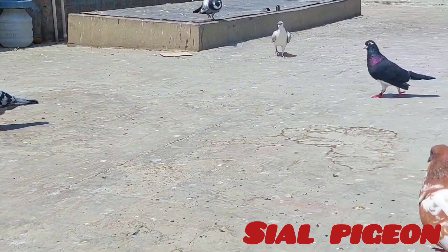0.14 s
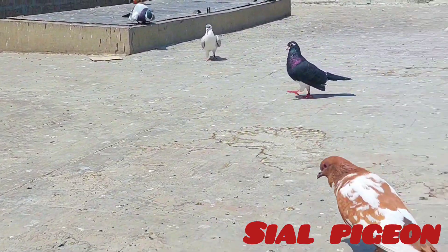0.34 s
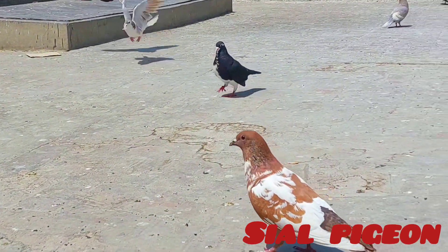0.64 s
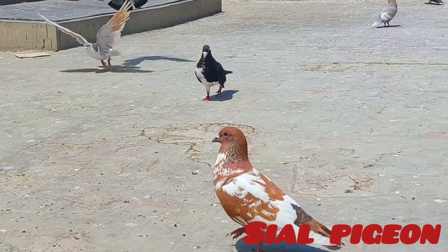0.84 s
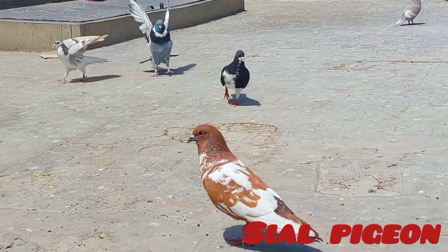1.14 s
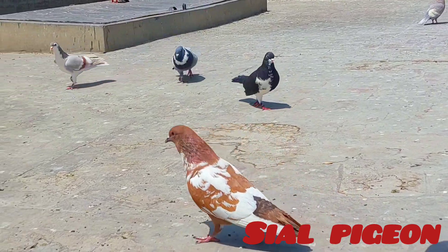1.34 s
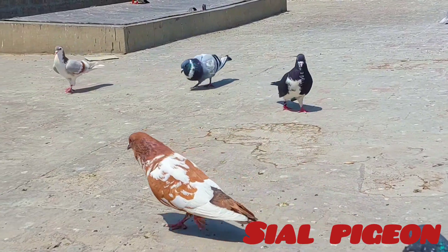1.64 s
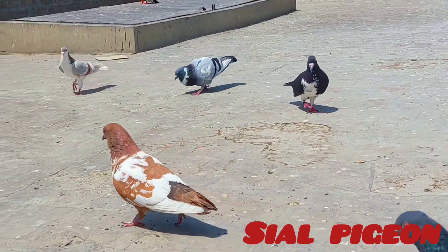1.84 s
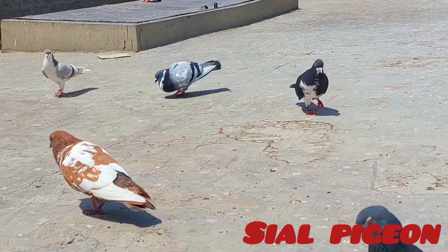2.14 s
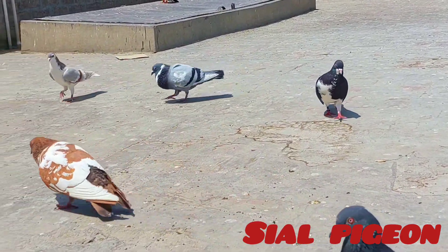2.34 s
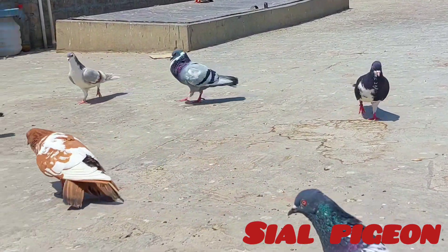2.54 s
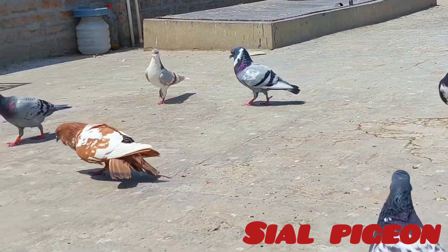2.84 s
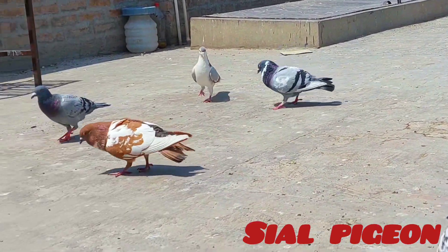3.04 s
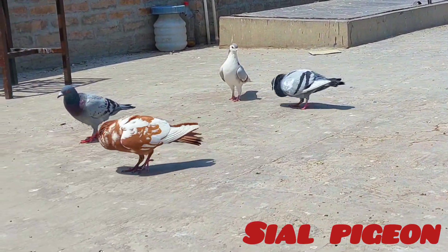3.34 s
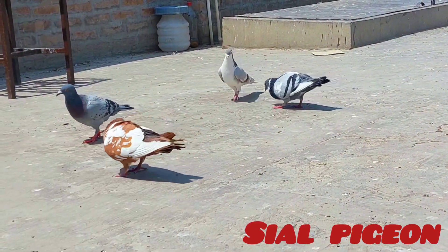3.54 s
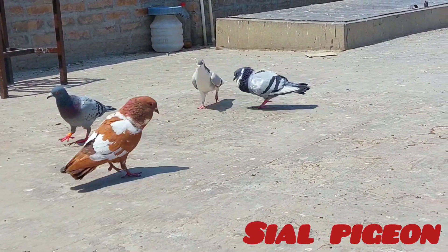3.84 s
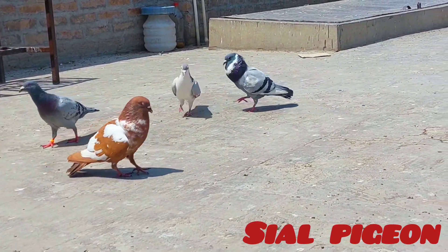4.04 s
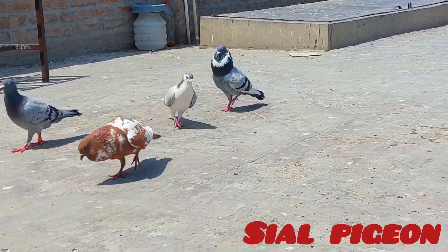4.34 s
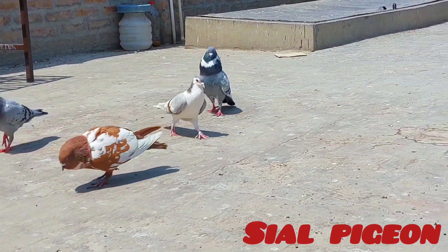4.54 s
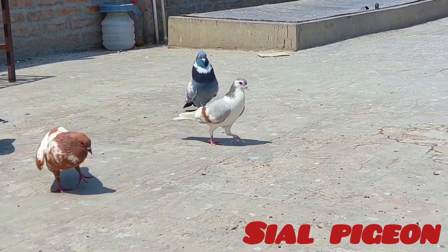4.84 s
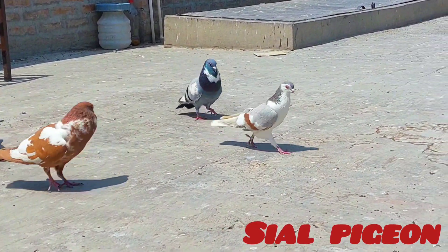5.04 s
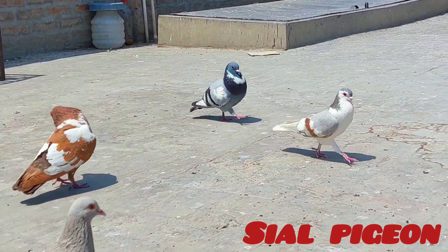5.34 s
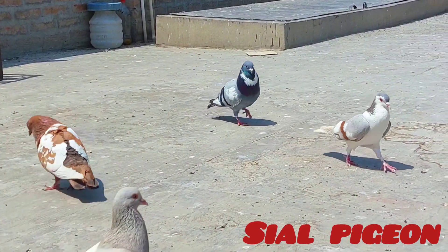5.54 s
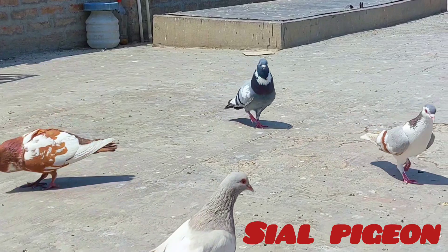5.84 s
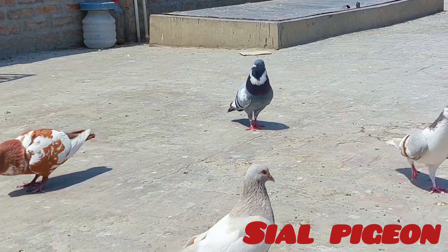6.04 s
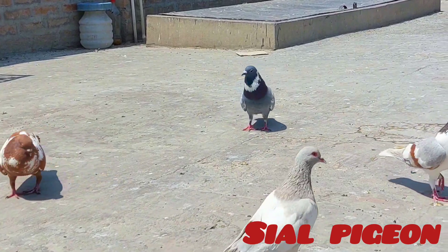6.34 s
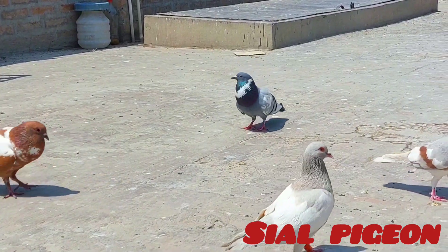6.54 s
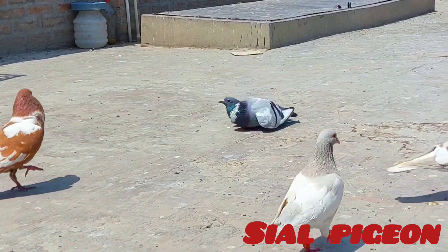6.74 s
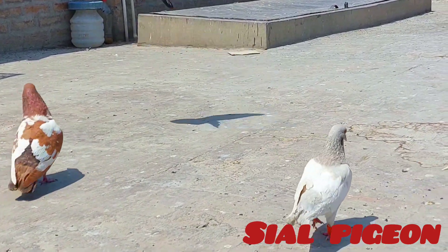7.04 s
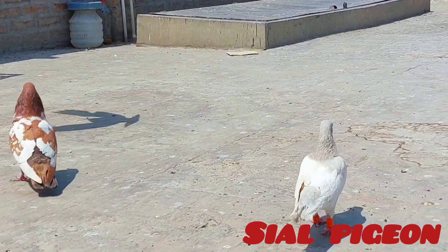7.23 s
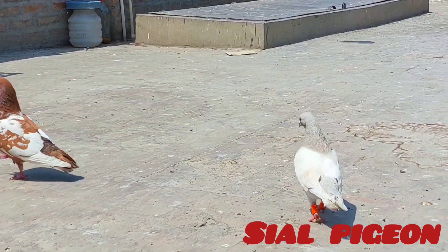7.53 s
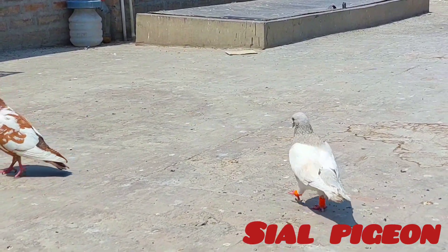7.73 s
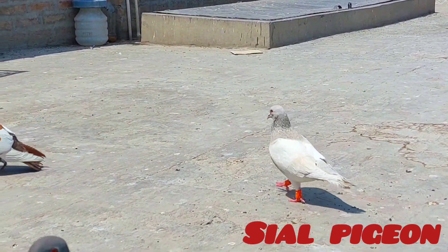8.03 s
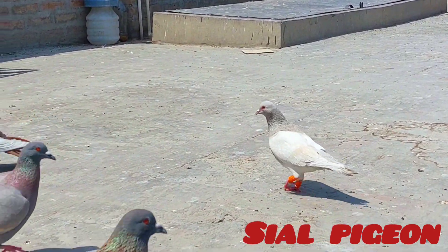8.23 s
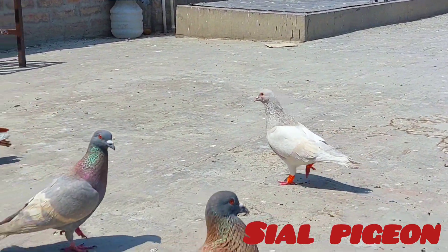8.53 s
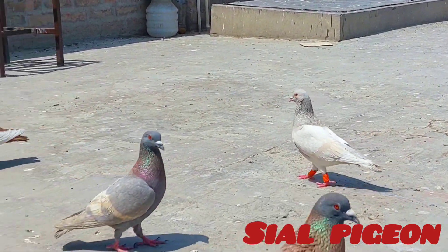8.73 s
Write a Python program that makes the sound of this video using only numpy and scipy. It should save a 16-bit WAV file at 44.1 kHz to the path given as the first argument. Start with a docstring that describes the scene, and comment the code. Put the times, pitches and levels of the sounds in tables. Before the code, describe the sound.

On an open rooftop, pigeons coo without pause, the nearest ones warbling and gulping in front of a softer chorus. Wings flutter briefly near the start and again a little later, among faint feather rustles and claws ticking on concrete. Towards the end one bird takes off with loud, dry wing claps. The sound is close and in stereo, with a slight echo and a faint distant town hum.

```python
"""Pigeons courting on a roof

A stereo pair on a walled concrete roof. Close by, a few birds coo from swollen crops, now clear, now
throbbing; further off the flock murmurs. Wings clap and swish as birds hop and one flies off; claws
tick, leg rings clink, feathers flick and rustle. Low walls give a short echo; the town rumbles far away."""
import sys
import numpy as np
from scipy import signal
from scipy.fft import rfft, irfft
from scipy.io import wavfile
from scipy.ndimage import uniform_filter1d

SR = 44100
rng = np.random.default_rng(int(sys.argv[2]) if len(sys.argv) > 2 else 0)


def persist_wave(psi):
    """Save psi, clipped to +-1, as 16-bit WAV."""
    counts = np.round(np.clip(psi, -1, 1) * 32767).astype(np.int16)
    wavfile.write(sys.argv[1], SR, np.atleast_2d(counts).T)


N = 391608
TIME = np.arange(N) / SR

# Levels are relative within each table. A positive pan is to the left; half of it separates the channels.
# the distant town's spectrum: (frequency [Hz], level [dB])
TOWN_SPECTRUM = [(25, -17.5), (50, -14.5), (70, -11), (100, -2), (148, 5.5), (180, -4), (400, -4),
                 (800, -26), (1400, -37), (2300, -35), (3200, -44), (8000, -44.5), (15000, -40)]
# its deep rumble coming and going: (time [s], level [dB])
TOWN_RUMBLE = [(0, -56.5), (1.2, -50), (2.3, -47), (2.6, -59), (3.2, -48.5), (4.3, -57.5), (5.3, -58),
               (5.8, -50.5), (6.4, -56), (7.7, -49), (8.2, -60), (8.88, -50)]
# bouts of ruffled feathers and shuffling feet: (start [s], length [s], level [dB])
RUSTLE_BOUTS = [(0.0, 0.1, -70), (0.443, 0.43, -60), (0.8, 0.25, -59.5), (1.22, 0.17, -65),
                (1.916, 0.72, -70), (2.832, 0.79, -59), (3.54, 0.18, -94), (5.178, 0.91, -64),
                (6.055, 0.8, -61.5), (6.836, 0.83, -52), (7.535, 0.66, -57.5), (8.208, 0.68, -65.5)]
# spectrum of that rustle: (frequency [Hz], level [dB])
RUSTLE_SPECTRUM = [(300, -14), (800, 8), (1400, -1), (2300, 0.5), (3300, -11), (4400, -6.5), (6300, -11),
                   (8500, -19), (12000, -9.5), (15500, -20.5)]
# a foot or feather tip brushing the floor: (time [s], level [dB], pan [dB])
FLOOR_BRUSHES = [(1.29, -66, 0), (2.025, -63, 8), (2.539, -53, 2), (2.584, -56, 7), (2.724, -53.5, 0),
                 (3.055, -56, -2), (3.31, -62, -1), (3.595, -57, 6), (3.655, -54.5, -7), (3.736, -65, 3),
                 (4.146, -60.5, 3.5), (4.22, -54.5, -5), (4.36, -53, -2), (4.48, -56, -8),
                 (4.529, -58.5, 1), (5.52, -55, 2), (5.67, -51.5, -10), (5.844, -55, -7), (6.031, -62, 7),
                 (8.025, -53, -14), (8.224, -52, 1), (8.59, -65, 4)]
# claws and beaks on concrete: (time [s], level [dB], pan [dB])
CLAW_TICKS = [(0.3062, -41, 5), (0.9165, -38, -12), (2.15, -39, 6), (2.326, -32.5, 4), (2.857, -30.5, -8),
              (3.361, -36, -11), (4.0435, -36, 8), (5.023, -40, -15), (6.351, -32.5, 13), (7.1077, -26, -7),
              (7.226, -37, -9), (7.353, -33, -1.5), (8.22, -33.5, 2), (8.588, -35, 5)]
# a leg ring jolted by a step: (time [s], level [dB])
RING_CLINKS = [(4.025, -51), (4.835, -60), (4.884, -61.5)]
# the ring's modes: (frequency [Hz], level [dB])
RING_MODES = [(4610, -7), (4890, -2), (5370, -14)]
# wing beats, and a few thin, bright feather flicks with hardly any smack:
# (time [s], level [dB], midrange smack [dB], swish against clap [dB], pan [dB])
BEATS_AND_FLICKS = [(0.5294, -32.5, -2.5, -5, -1), (0.545, -45, 2, 3.5, 3), (0.6085, -32, 3.5, -9, -4),
                    (0.73, -39.5, -3, -5, -3), (0.958, -32.5, 1.5, -1, -3), (0.979, -28, -15, -9, 3),
                    (2.8748, -32.5, -2.5, -4.5, -5), (2.99, -35, 0.5, -4, -1),
                    (3.1053, -34, -0.5, -15.5, -5), (3.229, -32, -0.5, -13, 3), (3.4021, -32.5, -20, -4, 9),
                    (3.496, -37, -1, -10, 0), (4.0154, -36.5, -22, -9.5, 22),
                    (4.6085, -34.5, -1, -4.5, 6.5), (4.8817, -41.5, -19, -8, 17.5),
                    (5.006, -41.5, -24, -5, 7), (6.3036, -36.5, 7, -8, 3),
                    (6.4303, -32.5, 1.5, -19.5, -7.5), (6.5564, -27.5, 0, -10, 1),
                    (6.691, -29, 1, -11.5, -2), (6.8306, -30.5, 0, -8, -3), (6.9593, -45, 3.5, 8.5, -1.5),
                    (7.0454, -24.5, -3, -7.5, 1), (7.16, -17.5, -2, -16.5, 3.5), (7.228, -31, 2, -15, -6),
                    (7.283, -22.5, -3.5, -13, -15), (7.4062, -14, -2.5, -18, -3),
                    (7.5489, -26.5, -2, -13, -2), (7.702, -32.5, 1, -23, 4), (8.4033, -31, -2, -11.5, 0),
                    (8.784, -43, -18, -15, 28)]
# spectrum of a wing's smack: (frequency [Hz], level [dB])
SMACK_SPECTRUM = [(50, -34), (150, 7), (500, -10), (700, 8), (1000, 3), (1600, 1.5), (2250, 3.5), (2700, 3),
                  (3400, -14.5), (6000, -41)]
# wing tips meeting hard: (time [s], level [dB], pan [dB])
WING_CRACKS = [(0.531, -33, -3), (0.61, -30, -4), (7.161, -18, 2), (7.172, -24, 2), (7.2995, -20, -2),
               (7.4068, -14.5, 2), (7.411, -7, -3)]
# the quills' modes: (frequency [Hz], level [dB], t60 before feather damping [s])
QUILL_MODES = [(1600, -22, 0.12), (1980, -1, 0.023), (2280, 1.5, 0.047), (2525, -3.5, 0.026),
               (2972, -17, 0.036), (4043, -19, 0.11)]
# the flock's murmur, further back: (time [s], level [dB])
FLOCK_MURMUR = [(0.0, -25.5), (0.89, -26.5), (1.19, -24.5), (1.43, -27.5), (1.73, -21.5), (2.03, -29.5),
                (2.42, -21.5), (3.04, -20.5), (4.7, -22), (4.99, -23.5), (5.39, -26.5), (5.44, -23.5),
                (6.18, -20), (6.48, -24.5), (6.6, -21.5), (7.54, -28.5), (7.86, -22.5), (8.88, -21)]
# the flock's high, strained voices: (time [s], level [dB])
FLOCK_STRAIN = [(0.0, -42), (0.52, -41.5), (0.62, -47), (0.99, -39.5), (2.0, -39), (2.82, -38),
                (2.89, -41.5), (3.56, -34.5), (4.2, -45.5), (4.57, -37), (4.62, -42), (5.89, -43.5),
                (6.03, -29.5), (6.13, -39), (6.95, -37.5), (7.32, -42), (7.81, -38), (8.88, -37.5)]
# close throat pulses, loud gulps to thin squeaks: (time [s], pitch [Hz], level [dB], glide [octaves])
NEAR_GULPS = [(0.235, 525, -33.5, 0.19), (0.257, 297, -21.5, 0.037), (0.449, 558, -41, -0.19),
              (0.489, 392, -23.5, -0.22), (0.819, 284.8, -18.5, -0.12), (0.86, 632, -36, -0.19),
              (0.93, 739, -42, -0.059), (0.981, 287, -16.5, -.15), (1.037, 308.6, -15, 0.0076),
              (1.087, 303, -20, -0.36), (1.138, 286.4, -21.5, 0.11), (1.163, 315.5, -19, -0.51),
              (1.196, 270, -16.5, -0.1), (1.925, 259, -29, -.15), (1.987, 289, -20.5, -0.2),
              (2.092, 309, -21.5, -0.22), (2.17, 704, -39, 0.033), (2.182, 299, -23, -0.27),
              (2.284, 630, -36, .35), (2.44, 391, -18.5, -0.26), (2.467, 335, -21, -0.11),
              (2.741, 301, -19.5, -.15), (3.005, 312.4, -17.5, -0.058), (3.062, 685, -39, .4),
              (3.085, 817, -47.5, -0.022), (3.175, 952, -44, 0.099), (3.305, 697, -41, 0.28),
              (3.516, 294.4, -20.5, -0.44), (3.638, 476, -25, -0.38), (3.652, 323, -18.5, -0.18),
              (3.89, 270, -21.5, 0.28), (3.994, 324, -20, -0.089), (4.263, 530, -35, -0.077),
              (4.339, 316.5, -21, -0.23), (4.558, 360, -20, -0.12), (5.011, 377.5, -21.5, 0.36),
              (5.06, 455, -28.5, -.15), (5.32, 609, -39, -.1), (5.652, 340, -21, -0.11),
              (5.822, 306, -22, -.15), (5.979, 307.5, -15.5, -0.21), (6.015, 547, -24, -0.21),
              (6.032, 278, -18, -0.19), (6.192, 338.3, -19, -0.33), (7.036, 309, -22.5, -.15),
              (7.165, 255, -22.5, -.15), (7.182, 686, -36, -.15), (7.803, 381.4, -17, -0.16),
              (7.885, 292, -23, .15), (8.141, 305, -22.5, -0.19), (8.236, 552, -34, 0.19),
              (8.283, 699, -39, -0.086), (8.306, 314.3, -17.5, -0.22), (8.322, 902, -40.5, 0.27),
              (8.326, 568, -30.5, 0.24), (8.538, 345, -20, -.15), (8.565, 641, -38.5, 0.33),
              (8.575, 778, -41, 0.31), (8.716, 481, -27.5, .3), (8.725, 615, -35.5, 0.34),
              (8.772, 519, -31.5, 0.16), (8.797, 372, -24, 0.18)]
# close coos: (start [s], swell [s], sink [s], start pitch [Hz], crest pitch [Hz], end pitch [Hz],
# crest level [dB], throb [0-1])
NEAR_COOS = [ (0.0, 0.038, 0.029, 237.7, 216, 236.5, -29.5, 0.4),
             (0.07, 0.12, .07, 494.4, 514, 553, -39.5, .7),
             (0.13, 0.066, 0.055, 294.4, 294.8, 298, -27.5, 0.4),
             (0.27, 0.036, 0.055, 660, 683, 647, -44.5, .15),
             (0.279, 0.052, 0.081, 320.7, 374.7, 437, -28, 0.5),
             (0.42, 0.055, 0.08, 319.5, 285.5, 298, -26.5, .2),
             (0.44, 0.05, 0.08, 531.3, 491, 438, -29.5, 0.8),
             (0.589, 0.058, 0.11, 275, 273, 266, -29.5, 0.8),
             (0.77, 0.46, 0.1821, 293, 304.8, 225.6, -28, 0.56),
             (0.87, 0.088, .08, 527.4, 540, 543, -43, .3),
             (1.15, 0.054, 0.066, 300, 287.2, 281, -26.5, 0.55),
             (1.219, 0.056, 0.099, 245.6, 222.4, 207.6, -30, 0.3),
             (1.56, 0.19, 0.17, 319, 298.8, 294.4, -25.5, 0.31),
             (1.65, 0.1, 0.095, 388.8, 400, 388.6, -27, 0.14),
             (1.72, 0.059, 0.1, 240, 225.7, 241, -31, 0.08),
             (2.18, 0.17, 0.089, 295.2, 337.7, 349, -24.5, 0.48),
             (2.29, .14, 0.1, 360, 403.6, 384.6, -25.5, 0.8),
             (2.45, 0.036, 0.2, 349, 314, 288.6, -24.5, 0.7),
             (2.52, 0.095, 0.14, 216.6, 204, 211, -36.5, 0.07), (2.511, .07, 0.04, 470, 491, 458, -35, .5),
             (2.65, 0.048, .13, 389.3, 407.4, 513.5, -29, 0.4),
             (2.71, 0.078, .18, 315.2, 311.3, 299.7, -25, 0.38),
             (2.99, 0.16, 0.294, 315.3, 332.4, 287.8, -26.5, 0.57),
             (3.36, 0.076, 0.035, 614, 637, 655, -41.5, .5),
             (3.48, 0.27, 0.21, 303.7, 325, 285.4, -24, 0.5),
             (3.51, 0.08, 0.13, 268.5, 226.4, 208.7, -26, 0.4),
             (3.57, .11, .06, 585, 524.6, 520, -38.5, .7),
             (3.95, 0.15, 0.11, 330.1, 351.3, 330.7, -21.5, 0.5),
             (4.029, 0.084, 0.06, 516.4, 519, 515, -37, 0.3),
             (4.18, 0.027, 0.15, 317, 303.3, 286, -24, 0.65),
             (4.18, 0.064, 0.11, 370, 367.8, 371, -24, .75),
             (4.331, 0.08, 0.12, 519.4, 503, 455, -33.5, 0.6),
             (4.41, 0.19, 0.051, 393.2, 321, 295, -22.5, 0.63),
             (4.52, 0.034, .06, 572, 528, 519, -30.5, 0.1),
             (4.62, 0.069, .17, 381.5, 370.3, 384, -25.5, 0.5),
             (4.669, 0.086, 0.17, 328.2, 293.8, 279.4, -26, 0.3),
             (5.08, 0.053, 0.048, 618, 660, 669, -45, 0.1),
             (5.1, 0.14, .05, 324.6, 290.8, 293.4, -24, 0.47),
             (5.27, 0.082, 0.069, 298.7, 335, 298.6, -20, 0.32),
             (5.481, 0.057, 0.1, 458.6, 439.4, 405, -32.5, 0.6),
             (5.6, 0.19, 0.087, 277, 298, 297.6, -34.5, 1),
             (5.63, 0.13, 0.084, 350.6, 367.3, 361.7, -28, 0.6),
             (5.93, 0.14, 0.052, 265, 277, 299, -28, 0.37), (5.9, .07, 0.074, 240.5, 245.3, 236, -30, .4),
             (5.96, 0.067, 0.11, 388.6, 375.3, 364, -27, 0.2),
             (6.121, 0.08, 0.057, 360, 351, 385, -28.5, 0.51),
             (6.13, 0.022, 0.3, 308.2, 317.8, 297.7, -21.5, 0.8),
             (6.209, 0.033, 0.031, 512, 527, 550, -37, .3), (6.3, 0.059, 0.23, 367.6, 390.8, 405, -27, 0.7),
             (6.55, 0.062, 0.067, 333.4, 303, 296.7, -21, 0.5),
             (6.63, 0.047, .17, 716, 685, 588, -47.5, .3),
             (6.72, 0.065, 0.051, 289.4, 310.7, 338.4, -19.5, 0.3),
             (6.829, 0.056, 0.173, 331.2, 343.8, 308.6, -26, 0.5),
             (7.12, 0.14, 0.091, 389.7, 362.5, 388.7, -33.5, 0),
             (7.139, 0.069, 0.087, 252, 247.7, 245.5, -32, 0.4),
             (7.6, 0.063, 0.044, 346.7, 383, 383, -30, .4), (7.651, 0.048, .08, 440, 476, 473, -36.5, 0.7),
             (7.82, .17, .08, 347.6, 296.6, 283, -26.5, 0), (7.87, 0.036, 0.037, 337.7, 388, 432, -27, .4),
             (7.9, 0.05, 0.058, 585, 633, 627, -49, 0), (8.02, 0.051, 0.044, 508, 469.5, 449, -35.5, .3),
             (8.27, 0.21, 0.18, 297.3, 355, 373.7, -25, 0.6),
             (8.778, 0.062, 0.094, 304, 258.6, 283, -30, 0.75), ]
# balance of the microphone pair: (frequency [Hz], left minus right [dB])
MIC_BALANCE = [(60, -3), (150, -4), (300, -2), (700, 0), (1300, -3), (2400, -10), (4400, -3), (8000, 4),
               (15000, 5)]


def undb(db):
    """Decibels to gain."""
    return 10 ** (np.asarray(db) / 20)


def unit(x):
    """Scale to rms 1."""
    return x / np.sqrt(np.mean(x ** 2) + 1e-18)


def curve(table):
    """Join (time, level) points by straight lines."""
    return np.interp(TIME, *np.transpose(table))


def walk(rate_hz, size, hold=8):
    """Smooth random drift of rms 1, each value held for a few samples."""
    knots = rng.standard_normal(int(size / SR * rate_hz) + 4)
    width = max(int(SR / rate_hz / hold), 1)
    path = np.interp(np.arange(size // hold + 1) * hold * rate_hz / SR, np.arange(len(knots)), knots)
    return np.repeat(unit(uniform_filter1d(path, width)), hold)[:size]


def band(x, lo_hz, hi_hz, order=2):
    """Causal band-pass."""
    edges = [lo_hz, min(hi_hz, SR / 2 - 1000)]
    return signal.sosfilt(signal.butter(order, edges, "band", fs=SR, output="sos"), x)


def colour(x, points):
    """Equalise by (frequency [Hz], level [dB]) points."""
    hz, db = np.transpose(points)
    f = np.maximum(np.fft.rfftfreq(N, 1 / SR), 1)
    return irfft(rfft(x) * undb(np.interp(np.log(f), np.log(hz), db)), N)


def pan(x, db):
    """Place a sound by its left minus right level."""
    return x * undb(np.array([[db], [-db]]) / 2)


def add(out, s, x):
    """Mix x into out from time s on."""
    i = int(s * SR)
    a, b = max(i, 0), min(i + x.shape[-1], N)
    if b > a:
        out[..., a:b] += x[..., a - i:b - i]


def town(level_db=-43.5, drift_db=.15, wide_hz=900):
    """The town from afar: a rumble and a wash, alike at both microphones in the bass, diffuse above."""
    mid, side, deep = rng.standard_normal((3, N))
    side = colour(side, [(50, -6), (150, -10), (wide_hz, 0)])
    wash = unit(colour(np.array([mid + side, mid - side]), TOWN_SPECTRUM))
    rumble = unit(band(deep, 47.8, 55.6)) * undb(curve(TOWN_RUMBLE))
    return wash * undb(level_db - drift_db * walk(1, N)) + rumble


def roof_echo(x, first_s=.011, t60=.43):
    """Floor and walls scatter sound to each microphone; the pattern shifts as the birds walk about."""
    t = np.arange(SR // 3) / SR
    hop = SR // 5
    fade = undb(-60 * t / t60) * (t > first_s)
    blend = np.sin(np.linspace(0, np.pi, 2 * hop))
    source = np.pad(x.mean(axis=0), (hop, 2 * hop))
    echo = np.zeros((2, N))
    for i in range(0, N + hop, hop):
        tail = fade * rng.standard_normal((2, len(t)))
        tail *= rng.random((2, len(t))) < .05 + t  # reflections thicken with time
        tail /= np.sqrt(np.sum(tail ** 2, axis=1, keepdims=True))
        piece = source[i:i + 2 * hop] * blend
        add(echo, (i - hop) / SR, signal.fftconvolve(piece[None], tail, axes=1))
    return echo


def rustle(gain_db=-2, fidget_db=-65, grain_db=2, flicker_db=2.03):
    """Feathers brush and feet scuff: dense grains of uneven size, in bouts that swell and fade."""
    motion = np.full(N, undb(fidget_db))  # feathers are never quite still
    for s, length_s, db in RUSTLE_BOUTS:
        add(motion, s, undb(db + gain_db) * np.sin(np.linspace(0, np.pi, int(length_s * SR))))
    sizes = undb(grain_db * np.minimum(rng.exponential(size=N // 64 + 1), 5))
    grains = rng.standard_normal((2, N)) * np.repeat(sizes, 64)[:N] * undb(flicker_db * walk(22, N))
    sound = colour(grains, RUSTLE_SPECTRUM)
    treble_rms = np.std(band(sound, 3000, 15000))
    return sound / treble_rms * motion


def floor_brushes(rise_s=.009, gain_db=1):
    """A light stroke over the concrete: a short hiss that eases in and dies away."""
    t = np.arange(SR // 8) / SR
    stroke = t / rise_s * np.exp(1 - t / rise_s)
    out = np.zeros((2, N))
    for s, db, pan_db in FLOOR_BRUSHES:
        add(out, s, pan(rng.standard_normal((2, len(t))) * stroke * undb(db + gain_db), pan_db / 2))
    return colour(out, [(500, -20.5), (2000, -2), (5000, 0), (8500, -5.5), (12000, 3), (15000, -2.5)])


def claw_ticks(t60=.038, gain_db=-7):
    """Hard little contacts with the floor, bright and gone at once."""
    t = np.arange(SR // 20) / SR
    out = np.zeros((2, N))
    for s, db, pan_db in CLAW_TICKS:
        tick = rng.standard_normal((2, len(t))) * undb(db + gain_db - 60 * t / t60)
        add(out, s, pan(tick, pan_db / 2))
    return band(out, 5500, 22000, order=1)


def ring_clinks(t60=.28, half_width_hz=35):
    """Left of centre a ring rattles on a bird's leg; its many tiny contacts blur the modes."""
    t = np.arange(SR // 4) / SR
    out = np.zeros((2, N))
    for s, db in RING_CLINKS:
        contacts = rng.standard_normal((2, len(t)))
        ring = sum(undb(mode_db) * band(contacts, hz - half_width_hz, hz + half_width_hz, order=1)
                   for hz, mode_db in RING_MODES)
        add(out, s, unit(ring) * undb(db - 60 * t / t60))
    return pan(out, 3.8)


def feather_crackle(size, depth_db=1.5, rate_hz=420):
    """Noise broken into little bursts, as one stiff feather after another flicks past."""
    return unit(rng.standard_normal((2, size)) * undb(depth_db * np.clip(walk(rate_hz, size), -2, 2)))


def beats_and_flicks(clap_t60=.05, swish_t60=.28, rise_s=.001, swish_rise_s=.0065, gain_db=-6, smack_db=6):
    """A wing beat slaps stiff feathers, thumps the air and swishes; a feather flick is thin and bright."""
    t = np.arange(SR // 3) / SR
    hiss, smack = np.zeros((2, 2, N))
    for s, db, mids_db, swish_db, pan_db in BEATS_AND_FLICKS:
        clap = (1 - np.exp(-t / rise_s)) * undb(-60 * t / clap_t60) * rng.standard_normal((2, len(t)))
        swish = (1 - np.exp(-t / swish_rise_s)) * undb(swish_db - 60 * t / swish_t60)
        burst = pan((clap + swish * feather_crackle(len(t))) * undb(db + gain_db), pan_db / 2)
        add(hiss, s - rise_s, burst)
        add(smack, s - rise_s, burst * undb(mids_db + smack_db))
    thump = band(hiss.mean(axis=0), 200, 300) * undb(15)
    treble = band(hiss, 2900, 18000)
    treble = colour(treble, [(3000, 3.5), (6000, 1.5), (8500, -5.5), (12000, -1), (15000, -5.5)])
    return treble + colour(smack, SMACK_SPECTRUM) + thump


def quill_cracks(gain_db=-7.5, damping_t60=.05, detune=.025):
    """Stiff quills strike each other and ring, dry and woody, damped by the feathers around them."""
    t = np.arange(SR // 12) / SR
    out = np.zeros((2, N))
    for s, db, pan_db in WING_CRACKS:
        ring = np.zeros((2, len(t)))
        for hz, mode_db, t60 in QUILL_MODES:
            cycles = hz * (1 + detune * rng.standard_normal()) * t + rng.random((2, 1))
            ring += undb(mode_db - 60 * t / t60) * np.sin(2 * np.pi * cycles)
        crack = ring / np.abs(ring).max() * undb(db + gain_db - 60 * t / damping_t60)
        add(out, s, pan(crack, pan_db / 2))
    return out


def syrinx(hz, throb, throb_hz, growl_hz=66.2, octave_db=-33, uneven=.35, sharpness=2.68):
    """A pigeon's voice: the swollen crop favours the fundamental; a flutter chops it into pulses."""
    size = len(hz)
    depth = np.clip(throb, 0, 1) ** 1.35
    pulse_count = rng.random() + np.cumsum(throb_hz * np.exp(uneven * walk(25, size))) / SR
    flutter = 2 * np.pi * pulse_count
    # each pulse has its own size and pitch
    scatter = rng.standard_normal((int(pulse_count[-1]) + 2, 2)).clip(-2, 2)
    louder, higher = (np.interp(pulse_count, np.arange(len(c)), c) for c in scatter.T)
    # the throat shudders faster inside the throb
    shudder = 2 * np.pi * np.cumsum(growl_hz * np.exp(uneven * walk(12, size))) / SR
    growl = 1 + .38 * np.sqrt(depth) * np.sin(shudder)
    opening = np.exp(sharpness * depth * (np.cos(flutter + .42 * np.cos(flutter)) - 1) / 2)
    gate = unit(growl * opening * undb(1.44 * depth * louder))
    # the harder the throb, the less steady the pitch
    waver = (.018 + .04 * depth) * walk(90, size)
    pitch = hz * np.exp2(.11 * depth * higher) * (1 - .029 * depth * np.sin(flutter) + waver)
    phase = 2 * np.pi * np.cumsum(pitch) / SR
    return gate * (np.sin(phase) + undb(octave_db) * np.sin(2 * phase))


def flock(levels, count, middle_hz, spread, arch, throb, throb_hz, edge_db, pan_spread_db=2):
    """Birds further off repeat coos that rise and fall; the deepest and highest voices are weakest."""
    out = np.zeros((2, N))
    for register in np.linspace(-1, 1, count):
        phrase = rng.random() + np.cumsum(rng.uniform(1.6, 2.6) * np.exp(.3 * walk(2, N))) / SR
        effort = np.sin(np.pi * phrase) ** 2
        hz = middle_hz * np.exp(spread * register + arch * (effort - .6) + .035 * walk(9, N))
        voice = syrinx(hz, throb, throb_hz * rng.uniform(.7, 1.4)) * np.sqrt(effort)
        out += pan(voice * undb(edge_db * register ** 2), pan_spread_db * rng.standard_normal())
    # evened out, so that as one bird falls silent another takes over
    running_rms = np.sqrt(uniform_filter1d(np.mean(out ** 2, axis=0), SR // 5) + 1e-9)
    return out / running_rms * undb(curve(levels))


def rasp(voices, low_db=-31, high_db=-44):
    """A little hoarseness above the voices, pulsing with them."""
    air = np.abs(voices) * rng.standard_normal((2, N))
    low = undb(low_db) * unit(band(air, 450, 650, order=3))
    high = undb(high_db) * unit(band(air, 850, 1150, order=3))
    return np.std(voices) * (low + high)


def near_gulps(length_s=.034, gain_db=-1.5, squeak_hz=724, waver=.041, rough_db=3, octave_db=-31.5):
    """Single throat pulses, close and centred: brief gliding tones, the higher the rougher."""
    t = np.arange(-length_s / 2, length_s / 2, 1 / SR)
    window = np.cos(np.pi * t / length_s) ** 2
    out = np.zeros(N)
    for s, hz, db, glide in NEAR_GULPS:
        strain = hz / squeak_hz
        pitch = hz * 2 ** (glide * t / length_s) * (1 + waver * strain * walk(150, len(t)))
        phase = 2 * np.pi * (rng.random() + np.cumsum(pitch) / SR)
        tone = np.sin(phase) + undb(octave_db) * np.sin(2 * phase)
        roughness = undb(rough_db * strain ** 2 * walk(170, len(t)))
        add(out, s + t[0], undb(db + gain_db) * window * unit(tone * roughness))
    return pan(out, 0)


def near_coos(gain_db=-1, swell_db=5.5, fade_s=.03, throb_hz=29, pan_spread_db=3):
    """Close to the microphones, each coo is one push of effort: it swells and sinks, bending the pitch."""
    out = np.zeros((2, N))
    for start, swell_s, sink_s, start_hz, crest_hz, end_hz, db, throb in NEAR_COOS:
        t = np.arange(-swell_s - fade_s, sink_s + fade_s, 1 / SR)  # zero at the crest
        effort = np.cos(np.pi / 2 * np.clip(t / np.where(t < 0, swell_s, sink_s), -1, 1)) ** 2
        rest_hz = np.where(t < 0, start_hz, end_hz)
        hz = rest_hz + (crest_hz - rest_hz) * effort
        fade = np.sin(np.pi / 2 * np.clip(np.minimum(t - t[0], t[-1] - t) / fade_s, 0, 1)) ** 2
        gain = fade * undb(db + gain_db - swell_db * (1 - effort))
        voice = unit(syrinx(hz, throb, throb_hz * rng.uniform(.743, 1.25))) * gain
        add(out, start - fade_s, pan(voice, pan_spread_db * rng.standard_normal()))
    return out


def scene():
    """The roof from the microphone position: near birds in front, then flock, walls and town."""
    near = near_coos() + near_gulps()
    murmur = undb(-6) * flock(FLOCK_MURMUR, count=6, middle_hz=305.9, spread=.25, arch=.1,
                              throb=.7, throb_hz=26.08, edge_db=-3)
    strained = undb(-3.5) * flock(FLOCK_STRAIN, count=3, middle_hz=464.4, spread=.15, arch=.14,
                                  throb=.8, throb_hz=30.04, edge_db=-5)
    movement = beats_and_flicks() + quill_cracks() + claw_ticks() + floor_brushes() + ring_clinks()
    # the strained voices face away from the microphones, so they arrive mostly off the walls
    echoes = roof_echo(undb(-7.5) * (near + murmur) + undb(3.5) * strained + undb(-10) * movement)
    voices = near + murmur + strained
    return voices + rasp(voices) + movement + echoes + rustle() + town()


def record(dry):
    """The two microphones differ in colour, and the top is cut steeply at 15.8 kHz."""
    hz, db = np.transpose(MIC_BALANCE)
    left = colour(dry[0], np.column_stack([hz, db / 2]))
    right = colour(dry[1], np.column_stack([hz, -db / 2]))
    top_cut = signal.ellip(8, .2, 70, 15800, fs=SR, output="sos")
    return signal.sosfilt(top_cut, np.array([left, right]))


dry = scene()
out = record(dry)
persist_wave(out)
```